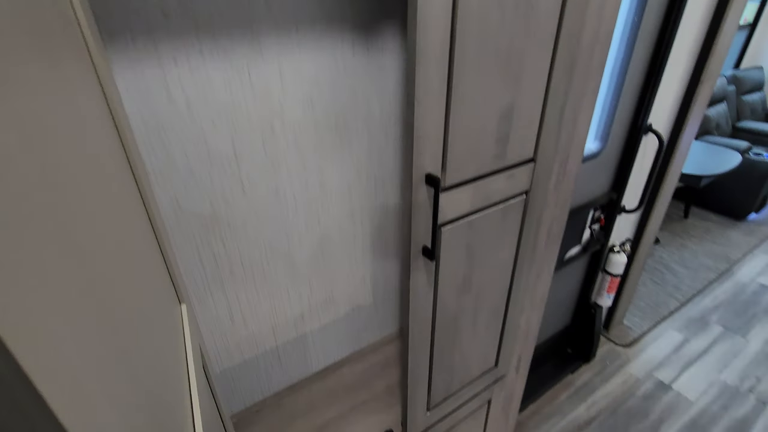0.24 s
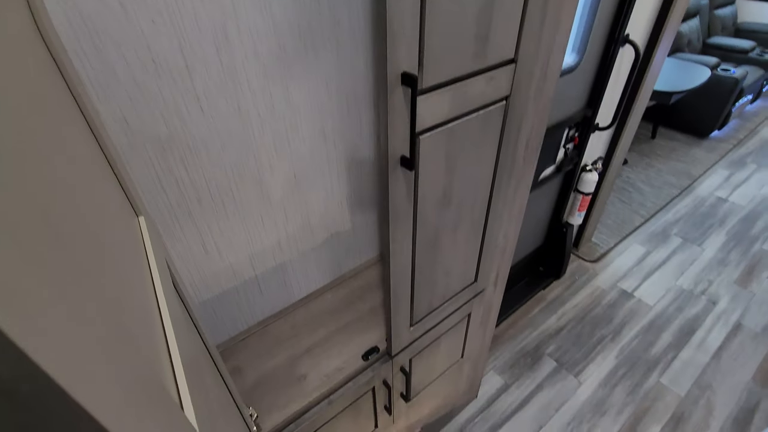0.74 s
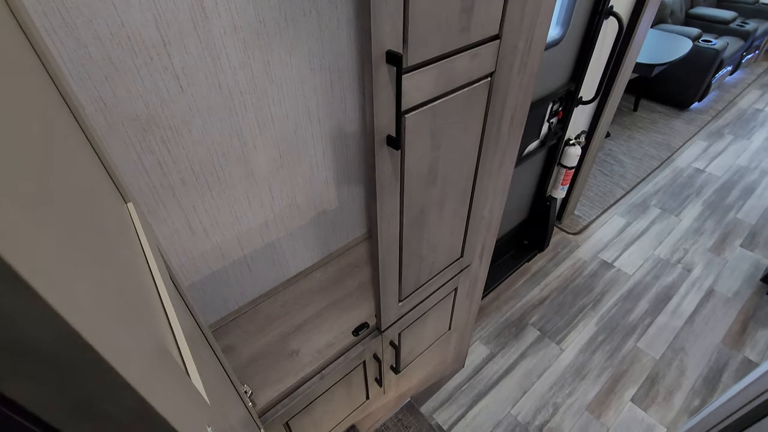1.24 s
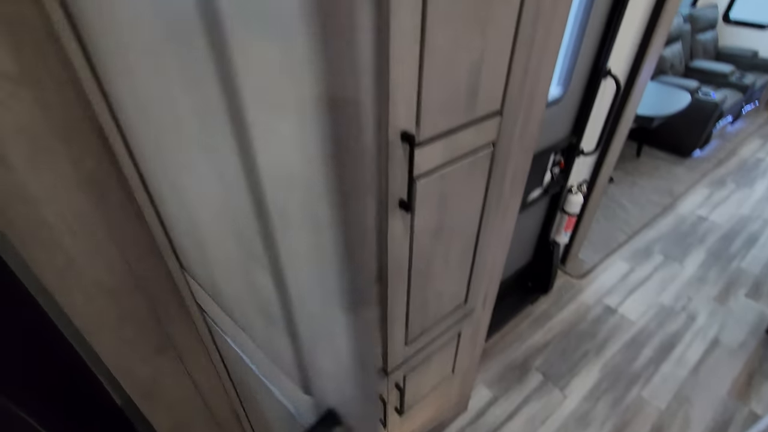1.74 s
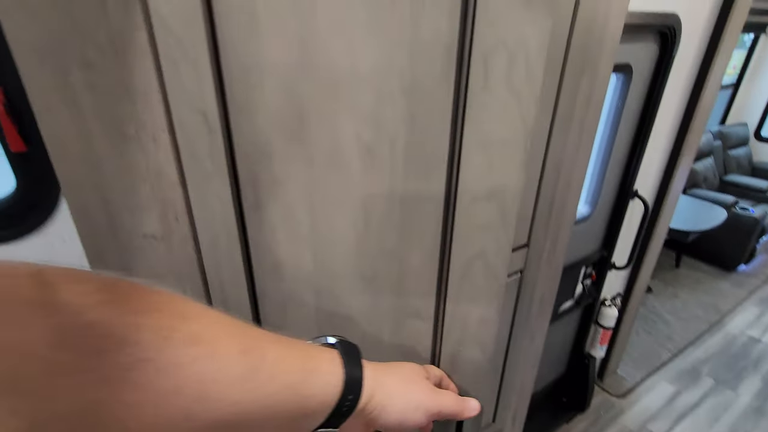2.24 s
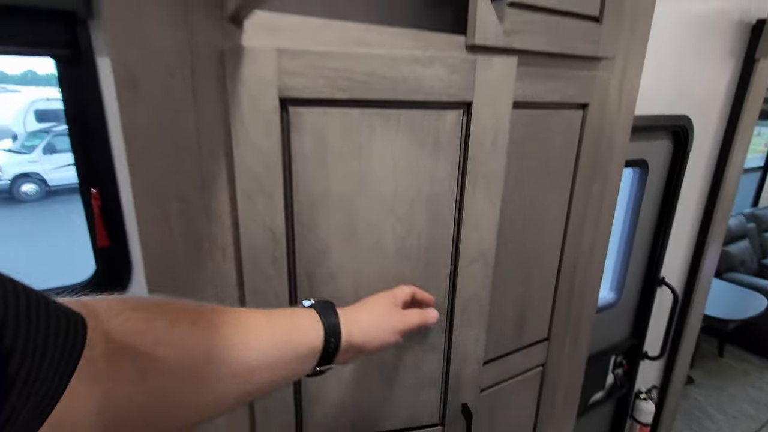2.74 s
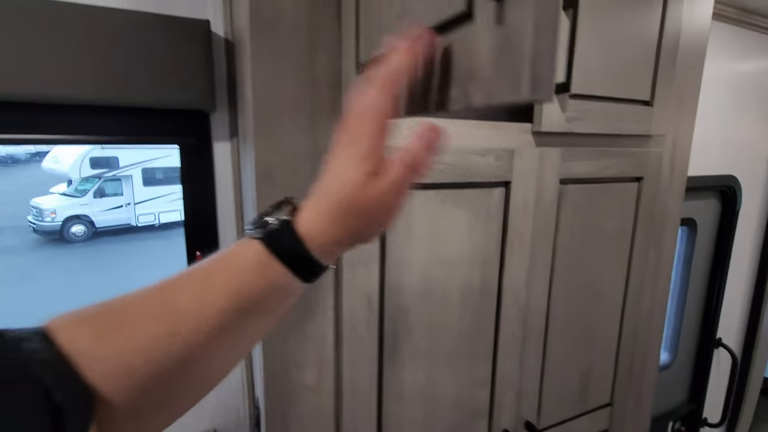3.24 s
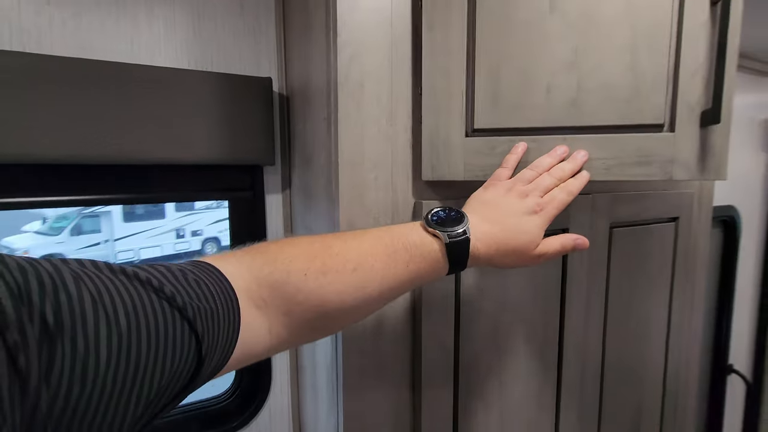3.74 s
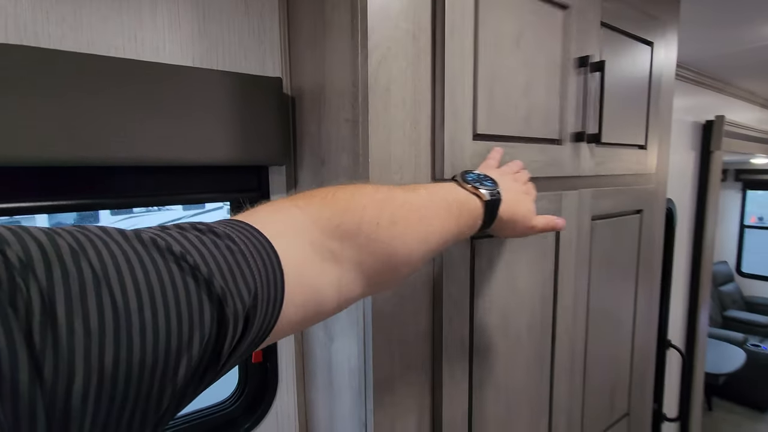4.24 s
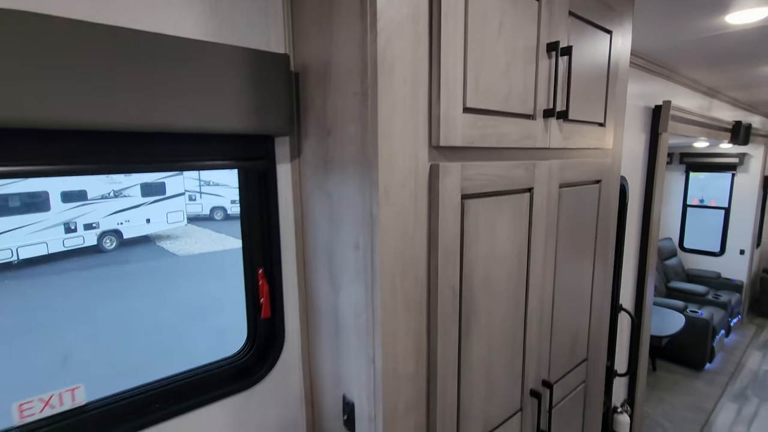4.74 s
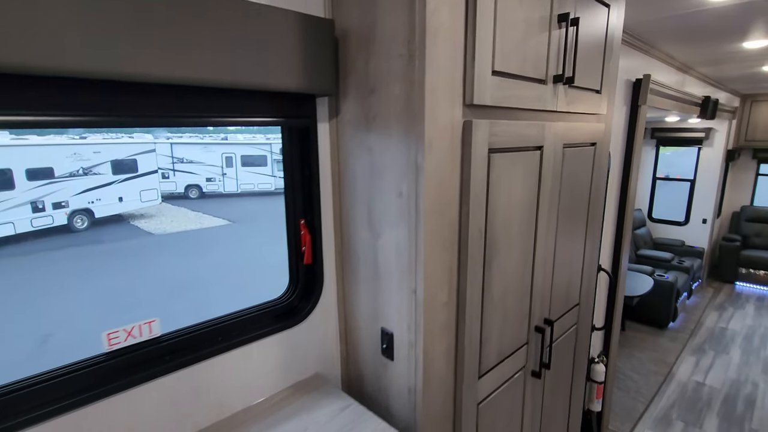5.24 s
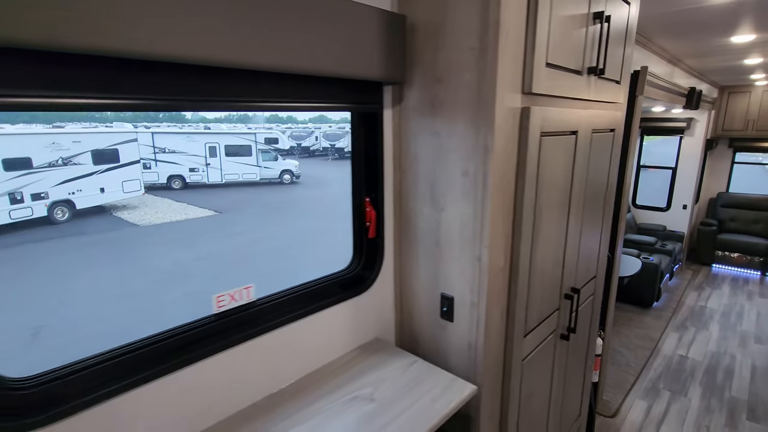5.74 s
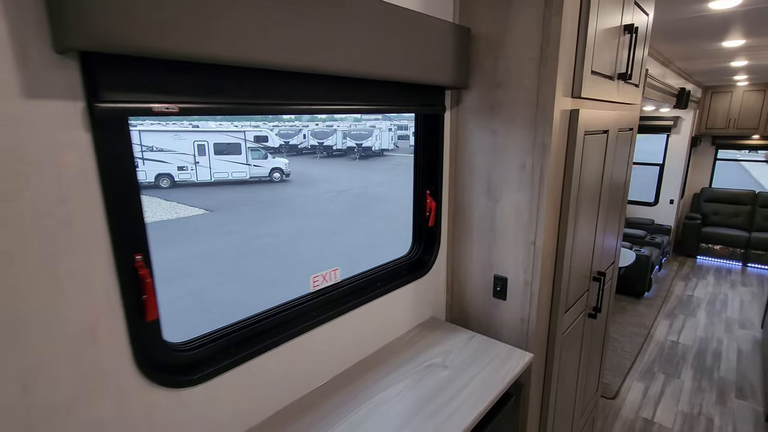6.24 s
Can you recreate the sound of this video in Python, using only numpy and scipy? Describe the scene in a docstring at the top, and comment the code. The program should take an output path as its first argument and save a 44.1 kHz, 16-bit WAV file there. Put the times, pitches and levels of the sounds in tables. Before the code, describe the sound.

Close phone microphone in a small camper. A low, wavering fan hum and faint hiss run underneath rustling clothes and tiny handling ticks. A dry hinge slips quietly, a hand brushes wood with small low bumps, then a wooden cabinet door slams hard and chatters against its frame. A second door slams with a deeper thud. Little clicks follow, then a softer wooden knock as the hum stays fainter.

```python
"""Two cabinet doors pushed shut in a camper

Inside a camper, a phone's microphone hangs an arm's length from two wooden overhead cabinet doors.
A dry hinge slips, a hand brushes off the wood, then each door shoves air ahead of it, cracks on its frame
and sets panel and cabinet ringing as decaying modes and banded noise; the first door shudders on.
A softer knock follows. Small clicks, rustling clothes and fingers on the phone, all shaped noise, lie over
a fan of wavering tones and rushing air that sinks as the phone backs off.
"""
import sys
import numpy as np
from scipy import signal
from scipy.fft import rfft, irfft
from scipy.io import wavfile

SR = 44100
rng = np.random.default_rng(int(sys.argv[2]) if len(sys.argv) > 2 else 0)


def dump(signal):
    """Clip the signal to [-1, 1] and save it as 16-bit WAV at the path in sys.argv[1]."""
    limited = np.clip(np.atleast_2d(signal).T, -1, 1)
    pcm = np.round(limited * 32767).astype(np.int16)
    wavfile.write(sys.argv[1], SR, pcm)


N = 285988
T = np.arange(N) / SR  # seconds


def amp(db):
    """Decibels to gain."""
    return 10 ** (np.asarray(db) / 20)


def unit(x):
    """Scale to rms 1."""
    return x / np.sqrt(np.mean(x ** 2))


def at(points, hz):
    """Read (Hz, value) points on a log-frequency axis."""
    f, value = np.transpose(points)
    return np.interp(np.log(np.maximum(hz, 1)), np.log(f), value)


def fade(t, t60):
    """Exponential decay, 60 dB down at t60 seconds."""
    return np.exp(-np.log(1000) * t / np.maximum(t60, 1e-3))


def noise(points, size):
    """Noise of rms 1 with the spectrum given as (Hz, dB) points."""
    white = rfft(rng.standard_normal(size))
    gain = amp(at(points, np.fft.rfftfreq(size, 1 / SR)))
    return unit(irfft(white * gain, size))


def walk(rate):
    """Random wander through `rate` new values a second, spread near 1."""
    knots = rng.standard_normal(512)
    return np.interp(T * rate, np.arange(len(knots)), knots)


def grain(size=128):
    """Fine roughness of rubbing: a new random level every few milliseconds."""
    return np.repeat(rng.standard_normal(N // size + 1), size)[:N]


def swell(start, attack, hold, release):
    """Gain that eases up to 1, stays and eases back to 0; all times in seconds."""
    corners = start + np.cumsum(np.abs([0, attack, hold, release]))
    return np.sin(np.pi / 2 * np.interp(T, corners, [0, 1, 1, 0])) ** 2


def add(out, s, x):
    """Mix x in at s seconds."""
    i = int(s * SR)
    out[i:i + len(x)] += x[:N - i]


def soften(x, hz):
    """A softer contact lasts longer and leaves out the treble above hz."""
    cutoff = np.clip(hz, 200, .45 * SR)
    return signal.sosfilt(signal.butter(2, cutoff, fs=SR, output="sos"), x)


def panel(modes, rise):
    """Struck panel: decaying modes that take a moment to spread across the wood."""
    t, ring = T[:SR], 0
    for k, (hz, db, t60) in enumerate(modes):
        sign = (-1) ** k  # neighbouring modes start in opposite directions
        ring = ring + sign * amp(db) * np.sin(2 * np.pi * hz * t) * fade(t, t60)
    return ring * (1 - np.exp(-t / rise)) / np.std(ring[:SR // 20])


# Decay in the cabinet and the room, before each sound's length factor.
# Each row: frequency in Hz, t60 in seconds.
CABINET_T60 = [(60, .48), (170, .42), (400, .38), (1000, .36), (2200, .4), (5000, .48), (9000, .45),
               (15000, .37)]


def cabinet(colour, hold, rise, length, count=36):
    """Countless close modes and reflections: they build up, hold while walls answer, then die band by band."""
    t, hz = T[:SR], np.fft.rfftfreq(SR, 1 / SR)
    edges = np.geomspace(28, 17000, count + 1)
    white, out, power = rfft(rng.standard_normal(SR)), 0, 0
    for lo, hi in zip(edges, edges[1:]):
        centre = np.sqrt(lo * hi)
        t60 = length * at(CABINET_T60, centre)
        shape = (1 - np.exp(-t / rise)) * fade(np.maximum(t - hold, 0), t60)
        band = irfft(white * ((hz >= lo) & (hz < hi)), SR) * shape
        gain = amp(at(colour, centre)) * np.sqrt(hi - lo)  # wider bands carry more power
        out = out + gain * unit(band) * np.sqrt(np.mean(shape ** 2))
        power += gain ** 2
    return out / np.sqrt(power)


# The fan's motor and mains tones as heard from two places in the camper.
# Each row: frequency in Hz, level by the wardrobe in dB, level by the window in dB, within the fan.
FAN_TONES = [(97.5, -9, -25), (107.7, -5.5, -16), (120, -15, -2.5), (146, -12, -23), (215.3, -11, -25),
             (239.3, -.5, -6), (323, -20, -23), (359, -15, -10), (436, -27, -17), (536, -25, -27),
             (718.5, -18, -26)]
# The fan's rush of air. Each row: frequency in Hz, level in dB.
FAN_AIR = [(25, -30.5), (55, -13.5), (100, -4), (170, -6.5), (290, -10), (400, -12), (520, -17), (660, -21),
           (820, -21.5), (1000, -27.5), (2000, -45), (4000, -71)]
# the fan is loudest by the wardrobe and sinks as the phone backs off towards the window
FAN_WARDROBE_DB, FAN_WINDOW_DB = -49.5, -61
LEAVE_S, LEAVE_EASE_S = 3.3, 1


def fan():
    """Motor and mains tones in a rush of air; standing waves change their balance from place to place."""
    moved = 1 - np.exp(-np.maximum(T - LEAVE_S, 0) / LEAVE_EASE_S)  # 0 by the wardrobe, towards 1 by the window
    tones = 0
    for hz, wardrobe_db, window_db in FAN_TONES:
        wavering_hz = hz * (1 + 0.002 * walk(6.3))
        phase = 2 * np.pi * np.cumsum(wavering_hz) / SR
        db = wardrobe_db + moved * (window_db - wardrobe_db) + 1.1 * walk(6)
        tones = tones + np.sqrt(2) * amp(db) * np.sin(phase)
    air = amp(-1.0 + 1.1 * walk(6.1)) * noise(FAN_AIR, N)
    distance_db = FAN_WARDROBE_DB + moved * (FAN_WINDOW_DB - FAN_WARDROBE_DB)
    return amp(distance_db) * (tones + air)


# Colour of the hiss, shared by the room and the rustling cloth. Each row: frequency in Hz, level in dB.
HISS_COLOUR = [(700, -3.5), (1300, 7), (2500, 0.5), (4000, 0.5), (6500, -1), (7500, -5.5), (12500, -7.5),
               (14000, -3), (16000, -8)]
HISS_DB = -69.5


def room():
    """Faint, even hiss of the room: steady shaped noise."""
    return amp(HISS_DB) * noise(HISS_COLOUR, N)


# Shifts of the body close to the microphone.
# Each row: middle in seconds, length in seconds, cloth level in dB, floor level in dB.
MOVES = [(.35, 1.66, -68.5, -58), (1.89, 1.2, -60, -51.5), (2.65, 1.3, -60, -46), (3.585, 0.88, -64, -54),
         (4.2, 0.58, -68.5, -54.5), (4.948, 0.16, -58, -70), (5.15, 0.72, -67.5, -80),
         (5.85, 1.18, -65, -55), (6.157, 0.27, -65, -54.5), (6.348, 0.31, -56, -49)]
# The floor under the weight. Each row: frequency in Hz, level in dB.
FLOOR_RUMBLE = [(30, -31), (70, -9.5), (120, 0.5), (200, -10), (400, -12), (800, -25), (2000, -42)]


def movement():
    """Each shift of the body swells and fades: cloth rustles unevenly over a low rumble of the floor."""
    cloth, floor = 0, 0
    for middle, length, cloth_db, floor_db in MOVES:
        effort = swell(middle - length / 2, length / 2, 0, length / 2)
        cloth = cloth + amp(cloth_db) * effort
        floor = floor + amp(floor_db) * effort
    unevenness = amp(1.0 * walk(24) + 1.2 * grain())
    rustle = cloth * unevenness * noise(HISS_COLOUR, N)
    return rustle + floor * noise(FLOOR_RUMBLE, N)


# The fingers shift on the phone between these two times, in seconds.
GRIP_SPAN = [0.056, 3.5]


def grip(count=45):
    """Fingers shifting on the phone's case: tiny dry ticks of noise, mostly faint."""
    out, t = np.zeros(N), T[:SR // 100]
    for when, chance in rng.random((count, 2)):
        dry_tick = np.diff(rng.standard_normal(len(t) + 1)) * fade(t, .004)  # differencing favours treble
        add(out, np.interp(when, [0, 1], GRIP_SPAN), amp(-62.5 + 13 * chance ** 3) * dry_tick)
    return out


def tick(pitch_hz, octaves, t60):
    """A small contact rings one broad or narrow resonance."""
    t = T[:SR // 4]
    hz = np.geomspace(30, 18000, 300)
    resonance_db = -20 * np.log10(1 + (np.log2(hz / pitch_hz) / octaves) ** 2)
    shape = (1 - np.exp(-t * pitch_hz)) * fade(t, t60)  # low bumps set in more gently
    ringing = noise(np.c_[hz, resonance_db], len(t)) * shape
    return unit(ringing) * np.sqrt(np.mean(shape ** 2))


# Small clicks and bumps around the cabinet.
# Each row: start in seconds, level in dB, pitch in Hz, width in octaves, t60 in seconds.
TICKS = [(0.077, -52, 1800, 1.5, 0.013), (.512, -55, 4730, 0.36, 0.032), (2.492, -32, 166, 0.12, 0.064),
         (2.546, -22, 180, 0.17, 0.032), (2.631, -22.5, 221, 0.39, 0.038), (2.8426, -18, 395, 0.41, 0.01),
         (2.8425, -35.5, 7050, 3.1, 0.0064), (3.612, -53, 3480, 0.32, 0.023),
         (4.104, -48.5, 860, 0.6, 0.14), (4.823, -44, 550, 0.49, 0.019), (4.86, -40, 600, 0.56, 0.029),
         (5.676, -46.5, 420, 0.48, 0.068), (5.823, -49, 1110, 0.35, 0.048)]
# the catch meets each door just as the air is pushed out
CATCH_DB, CATCH_HZ, CATCH_OCTAVES, CATCH_T60_S = -32, 452, .47, 0.17


def ticks():
    """Small resonant clicks and bumps, and the catch touching each door ahead of its slam."""
    out = np.zeros(N)
    for s, db, pitch_hz, octaves, t60 in TICKS:
        add(out, s, amp(db) * tick(pitch_hz, octaves, t60))
    for s, lead, *_ in SLAMS:
        add(out, s - lead - .003, amp(CATCH_DB) * tick(CATCH_HZ, CATCH_OCTAVES, CATCH_T60_S))
    return out


# The hinge slips as the door starts to swing.
# Each row: start in seconds, bracket level in dB (before the trims below), spring level in dB.
HINGE_SLIPS = [(1.573, -52, -63), (1.598, -55.5, -59), (1.635, -55.5, -65), (1.751, -75, -65),
               (1.806, -60, -56), (1.862, -68, -70)]
# Modes of the spring. Each row: frequency in Hz, level in dB, t60 in seconds.
HINGE_SPRING = [(2410, -1, 0.086), (2510, -9, 0.079)]
# Modes of the bracket. Each row: frequency in Hz, level in dB, t60 in seconds.
HINGE_BRACKET = [(773, -1, 0.17), (1113, 1, 0.2), (1260, -9, .16), (1416, -3, .12), (1740, 6, 0.078),
                 (2840, -15, 0.12)]
# Colour of the dry scrape. Each row: frequency in Hz, level in dB.
HINGE_SCRAPE = [(400, -21), (1200, 1), (2800, -7), (3500, -11), (9000, -25)]


def hinge():
    """Each slip of the dry hinge scrapes briefly, rings its bracket and pings its spring."""
    out = np.zeros(N)
    for s, bracket_db, spring_db in HINGE_SLIPS:
        scrape = cabinet(HINGE_SCRAPE, hold=0.0073, rise=.002, length=0.83)
        add(out, s, amp(bracket_db - 1.5) * scrape)
        add(out, s, amp(bracket_db - 5.0) * panel(HINGE_BRACKET, rise=0.0025))
        add(out, s, amp(spring_db) * panel(HINGE_SPRING, rise=0.0021))
    return out


# Colour of skin on wood. Each row: frequency in Hz, level in dB.
BRUSH_COLOUR = [(60, 6), (150, 19), (400, 11.5), (800, -2), (1400, 3), (2200, -4), (3000, -1.5),
                (5500, -7.5), (12000, -5.5), (15000, -3.5)]
# a hand brushing off the door: it speeds up, slides and lifts away
BRUSH_START_S, BRUSH_ATTACK_S, BRUSH_HOLD_S, BRUSH_RELEASE_S, BRUSH_DB = 2.505, 0.11, 0.1, 0.15, -45.5


def brush():
    """Skin sliding over the wood: a short swish of noise that catches and slips."""
    sliding = swell(BRUSH_START_S, BRUSH_ATTACK_S, BRUSH_HOLD_S, BRUSH_RELEASE_S)
    uneven_db = BRUSH_DB + 1.2 * walk(67) + 1.3 * grain()
    return sliding * amp(uneven_db) * noise(BRUSH_COLOUR, N)


def air_push(hz, turns):
    """One swing of pressure, peaking 50 ms in, as the closing door traps the air in the cabinet."""
    t = T[:SR // 10] - 1 / 20
    return np.cos(2 * np.pi * hz * t) / (1 + (hz * t / turns) ** 4)


# The two doors meeting their frames, an arm's length from the phone.
# Each row: start in seconds, lead of the air push in seconds, air push in Hz, air push in dB, crack in dB,
# thud in Hz, thud in dB, panel modes in dB, panel rise in seconds, cabinet ring in dB, ring hold in seconds.
SLAMS = [(2.9748, .026, 111.4, -14, -6.5, 120.6, -10, -11.5, .01, -10.5, .035),
         (4.3062, .013, 146.6, -16.5, -6.5, 110.1, -1.5, -10.5, 0.015, -13.5, 0.024)]
# Modes of each door's panel. Each row: frequency in Hz, level in dB, t60 in seconds.
FIRST_MODES = [(86, -7, .7), (135, -10, .8), (163, -4, .25), (180, -5, .25), (318, -5, .45), (382, -9, .6),
               (484, -6, .24), (748, -16, .45), (851, -8, .32), (985, -15, .28), (1098, -9, .33),
               (1200, -7, .26), (1308, -13, .35), (1380, -9, .33), (1456, -9, .37), (1576, -8, .33),
               (1701, -6, .2), (1979, -4, .27), (2083, -12, .36), (2282, -2, .18), (2442, -6, .25),
               (2492, -8, .24), (2575, -10, .3)]
SECOND_MODES = [(56, -14, .25), (84, -9, .25), (122, -12, .6), (178, 0, .18), (254, -10, .3),
                (312, -2, .18), (404, -5, .22), (506, -12, .3), (618, -14, .25), (799, -14, .24),
                (969, -17, .25), (1367, -15, .15), (1906, -15, .3), (1962, -17, .25), (2051, -19, .32),
                (2265, -11, .33), (2369, -14, .25), (2832, -18, .27), (3553, -21, .2), (4404, -27, .5),
                (4603, -23, .4), (4786, -22, .36), (7550, -24, .42)]
# Dense ring of the cabinet behind each door. Each row: frequency in Hz, level in dB.
FIRST_RING = [(28, -29.5), (50, -2), (80, -6.5), (170, 1.5), (225, -7.5), (330, -0.5), (560, -8.5),
              (830, -6), (930, -12.5), (1250, -7.5), (2000, -8), (2550, -10.5), (2750, -13.5),
              (6500, -29.5), (10000, -21.5), (16000, -33.5)]
SECOND_RING = [(30, -28), (55, -4), (170, -5.5), (225, -9.5), (420, -8.5), (850, -12), (1150, -18),
               (1450, -14.5), (1700, -22), (2350, -14), (4050, -26.5), (4700, -24.5), (10500, -26.5),
               (16000, -31)]
# Crack of the door's edge on the frame. Each row: frequency in Hz, level in dB.
CRACK_COLOUR = [(100, -17), (550, -12), (900, -7), (1500, -5), (2100, -1), (3200, -2), (5000, -14),
                (8000, -8), (11000, -2), (12500, -9), (16000, -6)]


def slams():
    """Air push, crack of the edge on the frame, thud of the carcass, then the panel and the cabinet ring."""
    out, t = np.zeros(N), T[:SR // 4]
    doors = zip(SLAMS, (FIRST_MODES, SECOND_MODES), (FIRST_RING, SECOND_RING))
    for settings, modes, ring in doors:
        s, lead, push_hz, push_db, crack_db, thud_hz, thud_db, modes_db, rise, ring_db, hold = settings
        push_s = s - lead - 1 / 20
        add(out, push_s, amp(push_db) * air_push(push_hz, turns=0.24))
        # the swinging door sends a slower, weaker wave ahead of it
        add(out, push_s, amp(push_db - 21.0) * air_push(hz=62.37, turns=1.1))
        contact = (1 - np.exp(-t / 0.00073)) * fade(np.maximum(t - .002, 0), 0.015)
        add(out, s, amp(crack_db) * contact * noise(CRACK_COLOUR, len(t)))
        thud = np.sin(2 * np.pi * thud_hz * t) * (1 - np.exp(-t / .005)) * fade(t, 0.15)
        add(out, s + 0.0064, amp(thud_db) * thud)
        add(out, s + .002, amp(modes_db) * panel(modes, rise))
        add(out, s, amp(ring_db) * cabinet(ring, hold, rise=0.006, length=1.016, count=56))
    return out


# Colour of the first door's chatter. Each row: frequency in Hz, level in dB.
SHUDDER_COLOUR = [(35, -22), (80, 2.5), (145, 1), (210, -3), (280, 1), (420, -3.5), (700, -7.5),
                  (1150, -13), (1600, -20.5), (2400, -26), (4000, -38), (9000, -43)]
# the first door bounces on its sprung hinge: full strength at first, then dying away
SHUDDER_START_S, SHUDDER_PERIOD_S, SHUDDER_JITTER_S = 3.077, .0435, .002
SHUDDER_DB, SHUDDER_SCATTER_DB = -22.5, 1.43
SHUDDER_HOLD_S, SHUDDER_FALL_DB_PER_S = 0.14, 53


def shudder(count=13):
    """The door chatters against its frame, never quite evenly; weaker bounces are softer and so duller."""
    out = np.zeros(N)
    for k, (late, harder) in enumerate(rng.standard_normal((count, 2))):
        age = k * SHUDDER_PERIOD_S
        lost_db = SHUDDER_FALL_DB_PER_S * max(age - SHUDDER_HOLD_S, 0)
        clack = cabinet(SHUDDER_COLOUR, hold=0.0047, rise=0.0013, length=0.47)
        ring = cabinet(SHUDDER_COLOUR, hold=0.0075, rise=0.0044, length=0.83)
        contact_hz = 8000 * amp(-.5 * lost_db)
        bounce = soften(amp(-0.5) * clack + amp(-7) * ring, contact_hz)
        bounce_s = SHUDDER_START_S + age + SHUDDER_JITTER_S * late
        bounce_db = SHUDDER_DB - lost_db + SHUDDER_SCATTER_DB * harder
        add(out, bounce_s, amp(bounce_db) * bounce)
    return out


# A softer wooden knock and the duller blow that follows.
# Each row: start in seconds, level in dB, contact cut-off in Hz.
KNOCKS = [(5.514, -33.5, 15000), (5.536, -39, 884)]
# Modes of the knocked wood. Each row: frequency in Hz, level in dB, t60 in seconds.
KNOCK_MODES = [(98, 1.5, 0.18), (240.4, 0, 0.38), (312, -10, 0.22), (406, -1.5, 0.086), (694, -29, 0.24),
               (1690, -6.5, 0.12), (1911, -26, 0.27), (2040, -38, 0.36), (2570, -23, 0.25),
               (2729, -24, 0.37)]
# Dense ring around the knock. Each row: frequency in Hz, level in dB.
KNOCK_RING = [(40, -24), (90, 6), (170, -2), (250, 2.5), (420, -9.5), (520, -12), (700, -8), (1250, -20.5),
              (1700, -8.5), (2200, -20.5), (2800, -22), (3500, -26), (6000, -35.5), (15000, -44)]


def knock():
    """A gentler blow rings wood and cabinet, settling with a dull second one."""
    out = np.zeros(N)
    for s, db, contact_hz in KNOCKS:
        wood = amp(0.5) * panel(KNOCK_MODES, rise=0.0031)
        ring = cabinet(KNOCK_RING, hold=0.0091, rise=0.0041, length=0.82)
        add(out, s, amp(db) * soften(wood + ring, contact_hz))
    return out


def scene():
    """Everything as it reaches the one microphone."""
    background = fan() + room() + movement() + grip()
    handling = ticks() + hinge() + brush()
    doors = slams() + shudder() + knock()
    return (background + handling + doors)[None]


TOP_HZ = 16100


def record(dry):
    """The phone sheds the deepest bass, rounds the peaks and cuts the top."""
    thinned = signal.sosfilt(signal.butter(4, 40, "high", fs=SR, output="sos"), dry)
    rounded = thinned / (1 + (thinned / .9) ** 8) ** (1 / 8)  # peaks level off towards 0.9
    return signal.sosfilt(signal.ellip(10, .1, 95, TOP_HZ, fs=SR, output="sos"), rounded)


dry = scene()
out = record(dry)
dump(out)
```